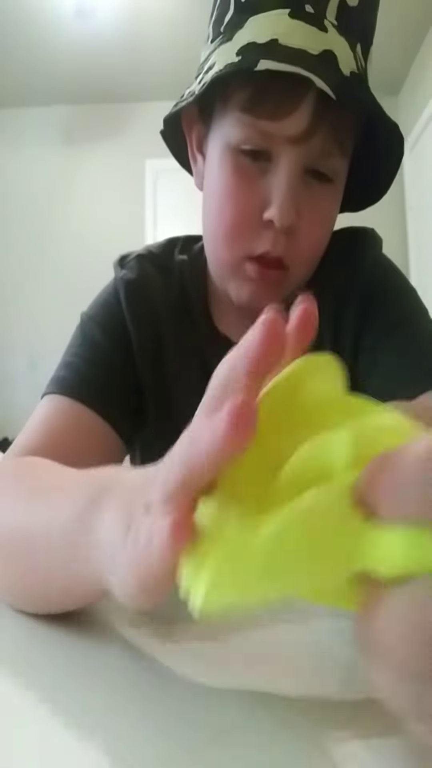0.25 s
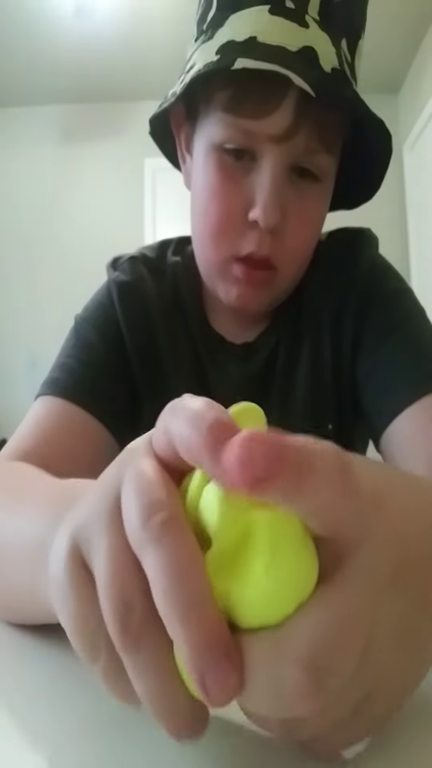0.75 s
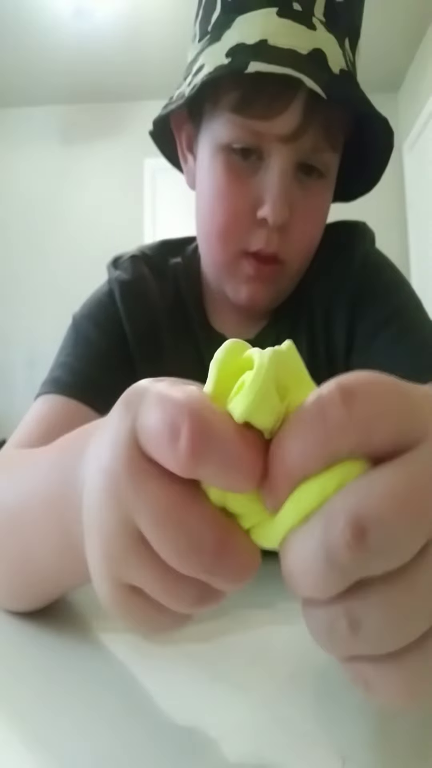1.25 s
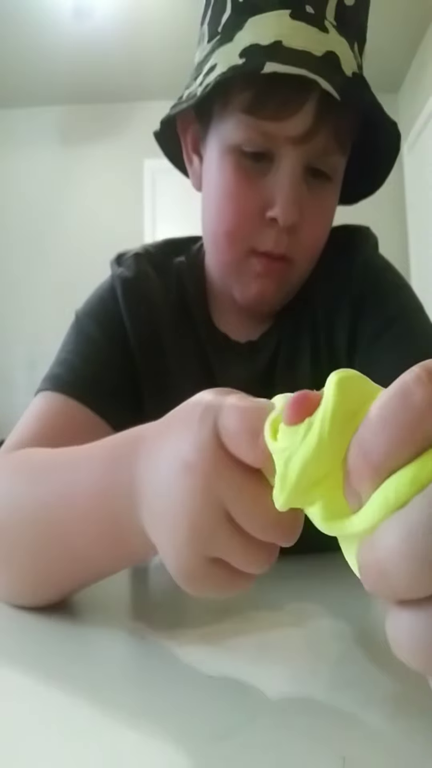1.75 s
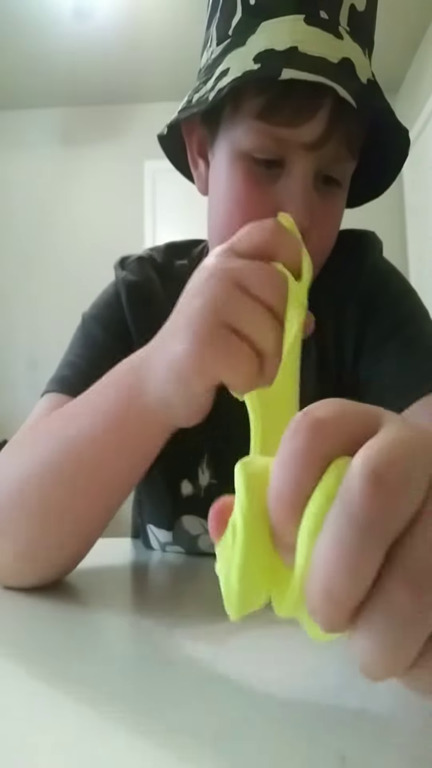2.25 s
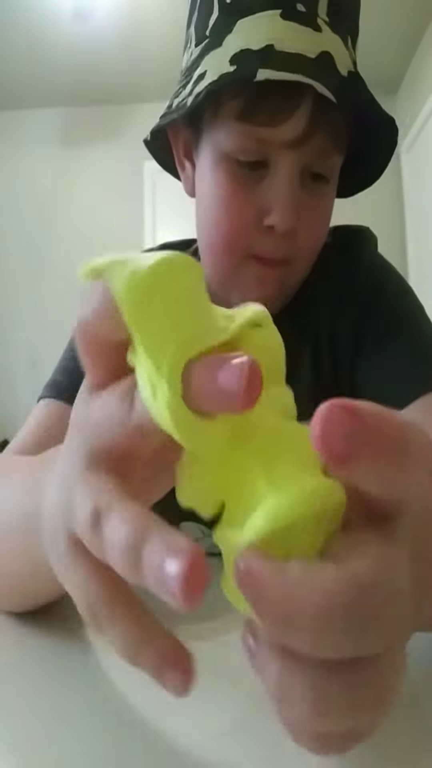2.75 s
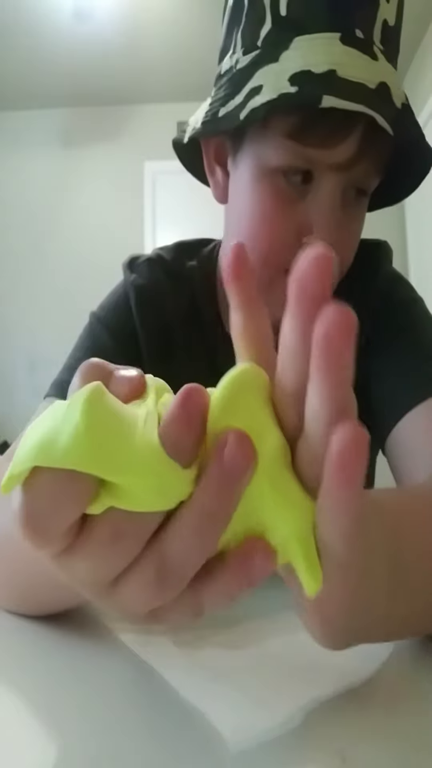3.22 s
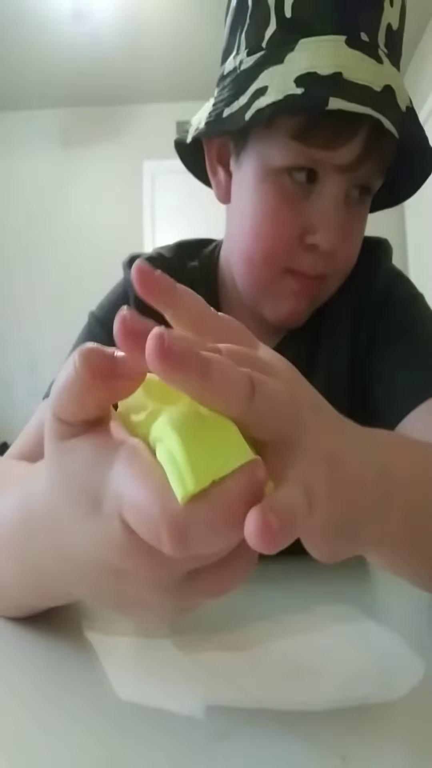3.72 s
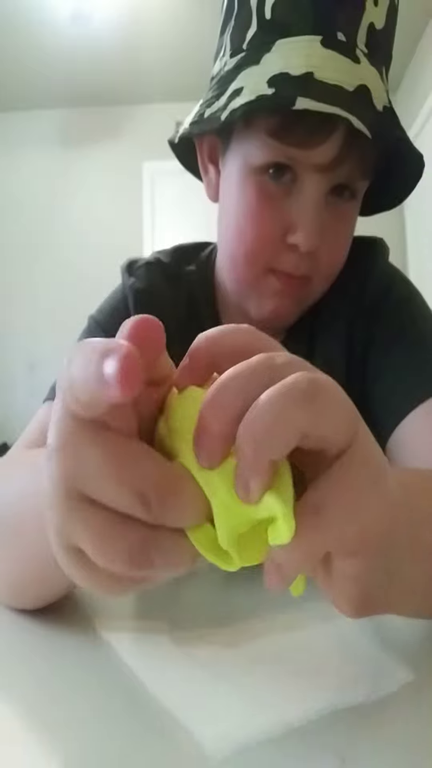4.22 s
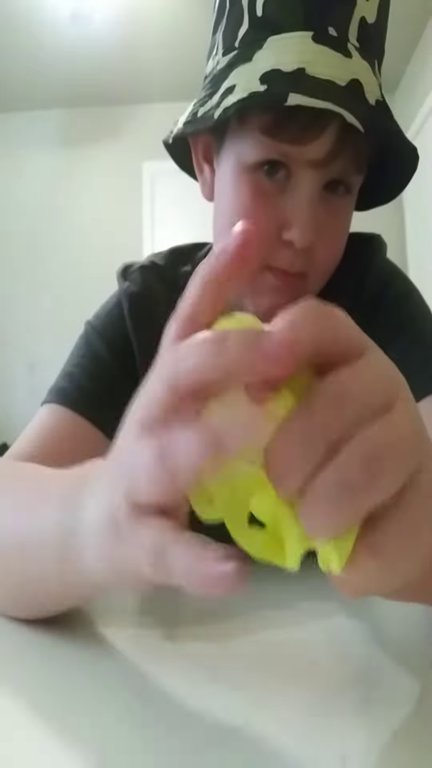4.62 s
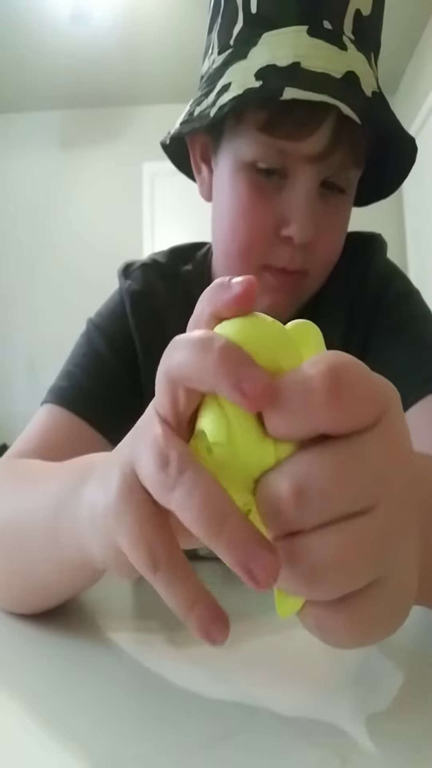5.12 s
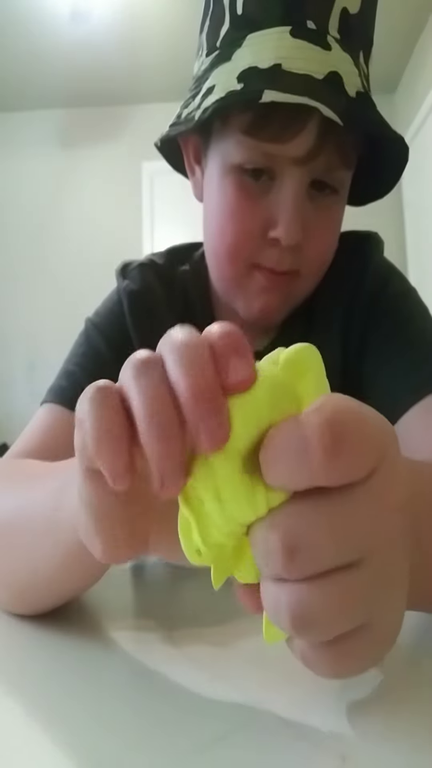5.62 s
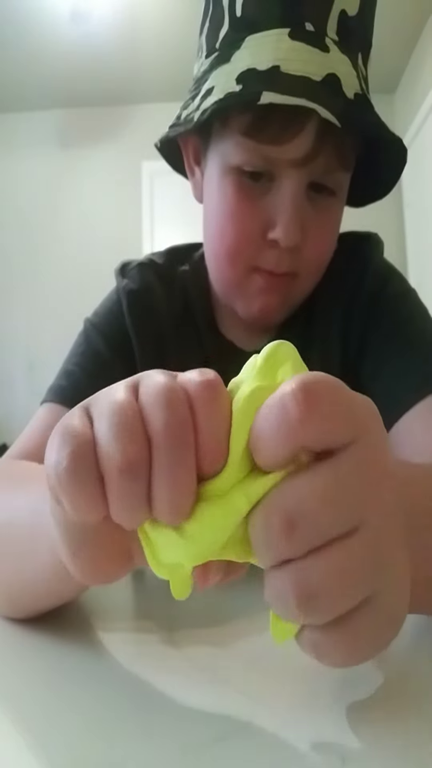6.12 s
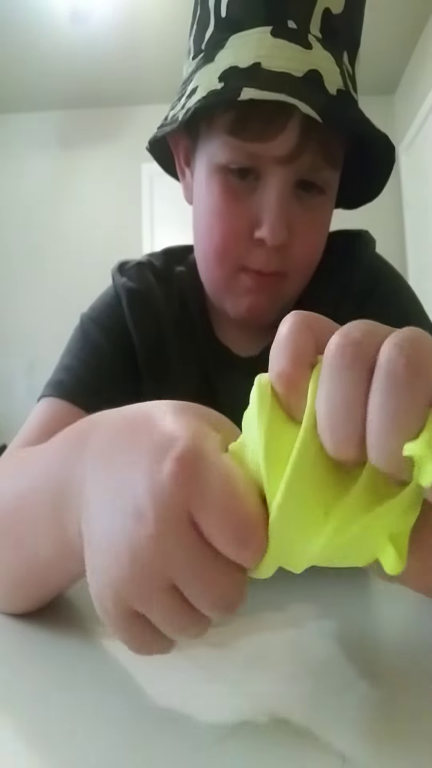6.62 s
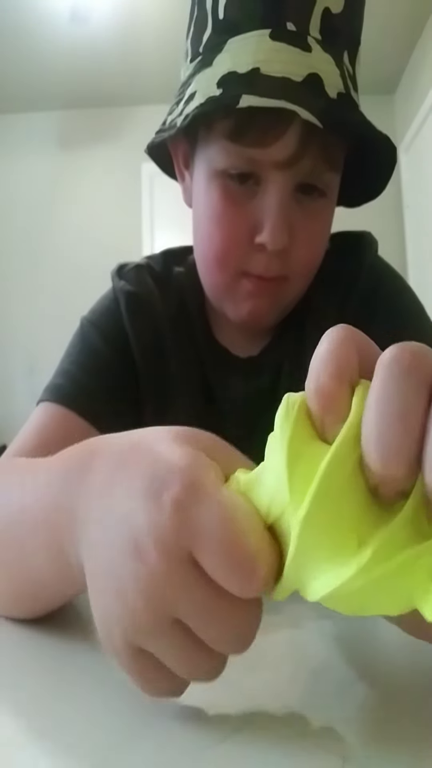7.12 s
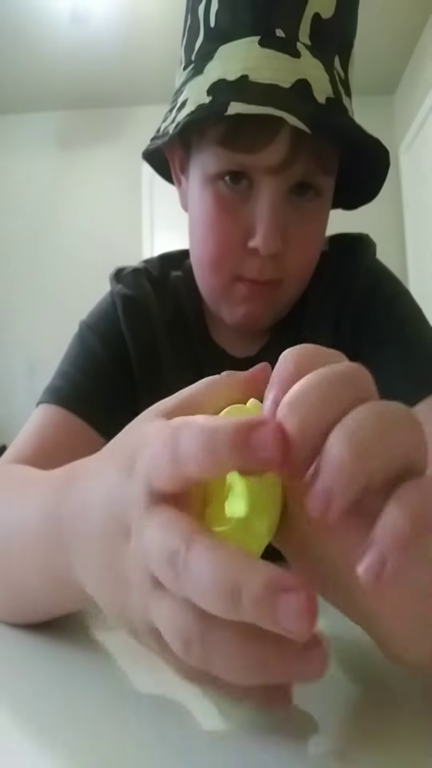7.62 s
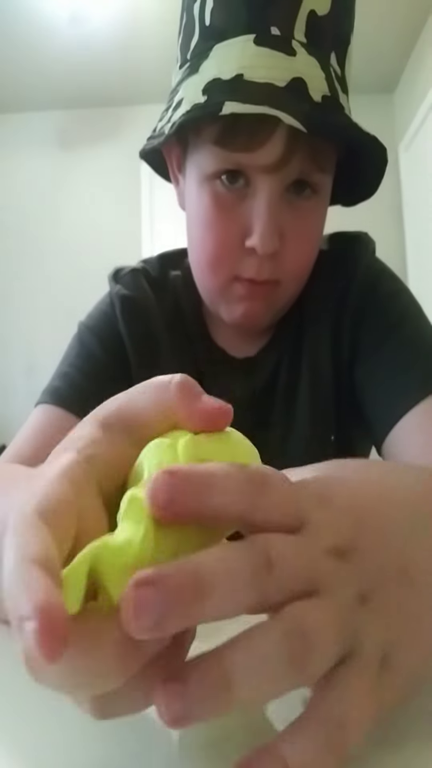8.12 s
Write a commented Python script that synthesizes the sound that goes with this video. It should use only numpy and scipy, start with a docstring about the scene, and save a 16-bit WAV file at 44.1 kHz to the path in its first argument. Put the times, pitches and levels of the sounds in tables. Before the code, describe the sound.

Hands knead a lump of soft slime above a table, close to a microphone standing on the top. A quiet wet squelch opens over a low rumble, which swells and fades with each squeeze. Forearms and knuckles thump the table irregularly, with tiny air pops between. Palms clap dully on the lump at about 0.9 and 1.3 seconds. Around 2.1 seconds comes a quick cluster of thumps and small squelches, then a stronger hollow clap at 3.2 seconds. A loud thump with a squelch lands at 4.6 seconds, followed by lighter knocks. The biggest squelch, with popping air and another loud thump, comes at 6.7 seconds. A few more knocks follow around 7.4 seconds and small pops near 7.9. The small bare room rings briefly after each sound, over a faint steady hiss.

```python
"""A wet squelch comes first, over a low rumble: hands squeeze air out of a lump of soft slime.
They knead it above a table in a small bare room, close to a microphone standing on the table top.
Forearms and knuckles thump the top and keep it trembling, palms clap the lump, and trapped air
pockets pop. The room rings after each sound, over a faint steady hiss."""
import sys
import numpy as np
from scipy import signal
from scipy.fft import rfft, irfft
from scipy.io import wavfile
from scipy.ndimage import uniform_filter1d

SR = 44100
rng = np.random.default_rng(int(sys.argv[2]) if len(sys.argv) > 2 else 0)


def log_audio(samples):
    """Write samples as a 16-bit WAV file to the path given in sys.argv[1]."""
    # one column per channel
    frames = np.atleast_2d(samples).T
    # limit to full scale, then quantise
    limited = np.clip(frames, -1, 1)
    pcm = np.round(limited * 32767).astype(np.int16)
    wavfile.write(sys.argv[1], SR, pcm)


N = 368233

# arms and knuckles on the table: (time [s], relative force [dB], contact time [ms])
THUMPS = [(0.2286, -27, 2.8), (0.802, -32, 8.4), (1.2423, -28, 3.5), (1.2978, -26, 4.9),
          (1.443, -30.5, 7.4), (1.7021, -34, 4.2), (2.064, -25, 6.8), (2.116, -21, 6.4),
          (2.162, -24.5, 8.7), (2.8704, -32, 1.8), (2.9286, -22.5, 2.36), (3.163, -29.5, 2.8),
          (3.605, -28, 7.8), (3.667, -24, 3.74), (4.45, -33.5, 6.9), (4.634, -13, 2.7), (4.698, -38.5, 1.7),
          (4.819, -21, 2.6), (5.0279, -23.5, 2.7), (5.5113, -33.5, 5.9), (5.751, -34, 8.1),
          (6.5307, -28.5, 4.64), (6.728, -14, 3.8), (6.7773, -19, 2.64), (7.092, -42.5, 2.5),
          (7.333, -26.5, 10.6), (7.4072, -25, 3.8), (7.4348, -28, 3.5), (7.5412, -23.5, 1.74),
          (7.893, -41.5, 1.6)]
# the top under the microphone: (pitch [Hz], width [Hz], gain [dB], way it moves the microphone [+1/-1])
TABLE_MODES = [(65.4, 24.3, -6.5, -1), (104.7, 33.5, 3, 1), (243.3, 68, 2.3, -1), (335, 65, -9, -1)]
# large folds of air squeezed out:
# (time [s], level [dB], lowest pitch [Hz], brightness [Hz], width [share of the lowest pitch])
SQUELCHES = [(0.002, -48.5, 368, 1500, 1.0), (2.03, -45, 429, 880, 0.36), (2.161, -46.5, 438, 890, 0.29),
             (4.633, -36, 358, 1360, 0.52), (6.7265, -31.5, 376, 2100, 0.6)]
# resonances of one fold: (pitch [multiple of the lowest], gain [dB])
FOLD_MODES = [(1, -2.5), (2.12, -0.5), (3.2, -9), (5.15, -11)]
# small air pockets bursting: (time [s], peak [dB], pitch [Hz], width [Hz], overtone gain [dB])
POPS = [(0.294, -67, 1890, 170, -25), (1.113, -72.5, 1520, 90, -25), (1.157, -56, 610, 110, -29),
        (1.816, -68.5, 960, 109, -23), (2.160, -48.5, 664, 200, -28), (2.160, -65.5, 1620, 200, -25),
        (3.365, -60.5, 1135, 140, -9), (5.025, -57, 860, 280, -20), (6.526, -52, 600, 171, -26),
        (6.706, -57, 1020, 250, -8), (6.7149, -45.5, 1116, 188, -11), (6.7311, -40, 1010, 380, -20),
        (7.894, -61, 1280, 125, -4), (7.901, -47.5, 1910, 705, -25), (7.927, -60, 1905, 150, -27)]
# palms closing on the lump: (time [s], puff peak [dB], brightness [Hz], peak of the hollow [dB])
CLAPS = [(0.9170, -43.5, 490, -34.5), (1.2970, -35, 537, -29), (2.87, -42.5, 370, -39.5),
         (3.1627, -24.5, 580, -29), (6.727, -37.5, 452, -29)]
# squeezes of the lump: (time of the hardest press [s], relative level [dB], build-up time [s])
SQUEEZES = [(0.0, -46.5, 0.3), (0.83, -55, 0.35), (1.42, -52, 0.37), (1.76, -55.5, 0.15), (2.22, -46, 0.28),
            (3.22, -42, 0.1), (3.7, -49.5, 0.19), (4.09, -52, 0.16), (4.77, -44.5, 0.25),
            (5.55, -49.5, 0.18), (6.09, -53.5, 0.19), (6.559, -49.5, 0.29), (6.92, -49.5, 0.31),
            (7.52, -47, 0.29)]
# the trembling table: (frequency [Hz], relative density [dB])
RUMBLE_SPECTRUM = [(20, -10), (38, -14.5), (55, -1), (85, 4.5), (120, -3), (165, -5), (240, -33),
                   (350, -31.5), (600, -49.5), (1500, -87)]
# the small bare room: (frequency [Hz], time to fall by 60 dB [s])
ROOM_DECAY = [(70, 0.58), (150, 0.3), (400, 0.28), (1000, 0.28), (3000, 0.19)]
# the background hiss: (frequency [Hz], relative density [dB])
HISS_SPECTRUM = [(20, 9), (200, 19.5), (400, 9.5), (800, 4.5), (1500, 2.5), (3000, -0.5), (6000, -2.5),
                 (15000, -3)]


def thumps(spread_db_per_ms=0):
    """Flesh cushions each blow; the table's modes swell and die as the bending wave crosses it."""
    t = np.arange(SR // 4) / SR
    ring, force = np.zeros(len(t)), np.zeros(N)
    for hz, width, db, way in TABLE_MODES:
        age = np.pi * width * t
        ring += np.sign(way) * gain_of(db) * age * np.exp(-age) * np.sin(2 * np.pi * hz * t)
    lead_s = 0.01  # centres each push on its time
    for s, db, contact_ms in THUMPS:
        push = np.exp(-8 * ((t - lead_s) * 1000 / contact_ms) ** 2)
        add(force, s - lead_s, gain_of(db + spread_db_per_ms * contact_ms) * push / push.sum())
    return signal.fftconvolve(force, ring)[:N]


def pops(spatter_db=-10, spatter_s=0.02, scatter_octaves=0.4, neighbours=6):
    """Each pocket bursts; the more it tears, the more loudly its small neighbours burst after it."""
    out = np.zeros(N)
    for s, db, hz, width in air_pockets():
        add(out, s, bubble(db, hz, width))
        tearing = width / hz
        for late, shift in rng.random((neighbours, 2)):
            neighbour_hz = hz * 2 ** (scatter_octaves * (2 * shift - 1))
            add(out, s + spatter_s * late, tearing * bubble(db + spatter_db, neighbour_hz, width))
    return out


def air_pockets(dull_db_per_octave=45, width_growth=0.66, overtone_ratio=1.5):
    """Air rings in folds, small pockets and smacks: (time [s], peak [dB], pitch [Hz], width [Hz])."""
    for s, db, hz, top_hz, share in SQUELCHES:
        for multiple, mode_db in FOLD_MODES:
            dull_db = dull_db_per_octave * max(np.log2(multiple * hz / top_hz), 0)
            yield s, db + mode_db - dull_db, multiple * hz, share * hz * multiple ** width_growth
    for s, db, hz, width, overtone_db in POPS:
        yield s, db, hz, width
        yield s, db + overtone_db, overtone_ratio * hz, width
    # the slime smacks with each knock, less the slower the knock
    smack_db, smack_db_per_ms, smack_hz, smack_width_hz = -20, -7.5, 775, 320
    for s, db, contact_ms in THUMPS:
        yield s, db + smack_db + smack_db_per_ms * contact_ms, smack_hz, smack_width_hz


def bubble(db, hz, width, rise=0.012):
    """An air pocket rings for a few cycles; its pitch climbs a little as the hole widens."""
    age = np.pi * width * np.arange(SR // 12) / SR / 2  # 1 at the loudest moment
    turns = np.cumsum(hz * (1 + rise * np.tanh(age - 1))) / SR
    return gain_of(db) * (age * np.exp(1 - age)) ** 2 * np.sin(2 * np.pi * turns)


def claps(lowest_hz=135, hollow_hz=185, hollow_width_hz=185):
    """A palm drives a dull puff of air out of the lump; the hollow between the hands answers briefly."""
    out, impulse = np.zeros(N), signal.unit_impulse(SR // 10)
    for s, db, top_hz, hollow_db in CLAPS:
        puff = signal.sosfilt(signal.butter(7, top_hz, fs=SR, output="sos"), impulse)
        puff = signal.sosfilt(signal.butter(1, top_hz / 2, fs=SR, output="sos"), puff)
        puff = signal.sosfilt(signal.butter(3, lowest_hz, "high", fs=SR, output="sos"), puff)
        add(out, s, -gain_of(db) * puff / abs(puff).max())
        add(out, s, -bubble(hollow_db, hollow_hz, hollow_width_hz))
    return out


def rumble(gain_db=2.5, rest_db=-66, build_db=20, release_db_per_s=79.5):
    """The arms keep the table trembling under the microphone; each squeeze builds, peaks and lets go."""
    t = np.arange(N) / SR
    presses_db = [db - np.maximum(build_db * (s - t) / build_s, release_db_per_s * (t - s))
                  for s, db, build_s in SQUEEZES]
    effort = np.sqrt(gain_of(rest_db) ** 2 + (gain_of(presses_db) ** 2).sum(0))
    return gain_of(gain_db) * effort * noise(RUMBLE_SPECTRUM)


def room(sound, delay_s, build_s, tails=4):
    """The hands move about, so the pattern of reflections at the microphone keeps changing."""
    turn = np.pi * np.arange(N) / SR
    out = np.zeros(N)
    for k in range(tails):
        share = np.cos(turn + np.pi * k / tails)
        out += signal.fftconvolve(sound * share, room_tail(delay_s, build_s))[:N]
    return out * np.sqrt(2 / tails)


def room_tail(delay_s, build_s):
    """Dense reflections build up, then die band by band, the bass last."""
    hz, t, bands = signal.stft(rng.standard_normal(SR), SR, nperseg=512)
    decay = gain_of(-60 * t / value_at(ROOM_DECAY, hz)[:, None])
    echoes = signal.istft(bands * decay, SR)[1][:SR]
    age = np.maximum(np.arange(SR) / SR - delay_s, 0)
    spectrum = rfft(echoes * (1 - np.exp(-age / build_s)))
    band_power = uniform_filter1d(abs(spectrum) ** 2, size=90)
    return irfft(spectrum / np.sqrt(band_power), SR)  # equal power in every band


def hiss(level_db=-73.5):
    """A faint steady hiss lies behind everything."""
    return gain_of(level_db) * noise(HISS_SPECTRUM)


def noise(spectrum):
    """Noise of rms 1 with the given spectral shape."""
    shape = gain_of(value_at(spectrum, np.fft.rfftfreq(N, 1 / SR)))
    x = irfft(rfft(rng.standard_normal(N)) * shape, N)
    return x / x.std()


def gain_of(db):
    """Decibels to gain."""
    return 10 ** (np.asarray(db) / 20)


def value_at(points, hz):
    """A curve's value at hz, its points joined on a log frequency axis."""
    f, value = np.transpose(points)
    return np.interp(np.log(hz + 1), np.log(f + 1), value)


def add(mix, s, sound):
    """Lays a sound into the mix at time s."""
    part = mix[max(round(s * SR), 0):][:len(sound)]
    part += sound[:len(part)]


def scene(thump_room_db=-15.0, clap_room_db=-8, pop_room_db=-7.0):
    """Table, hands and slime close to the microphone, the room and the hiss behind them; mono."""
    palms, slime = claps(), pops()
    near = thumps() + palms + slime + rumble()
    # a slow push rocks the whole top, so it spreads more sound into the room than a quick knock
    table_send = gain_of(thump_room_db) * thumps(spread_db_per_ms=1.48)
    hands_send = gain_of(clap_room_db) * palms + gain_of(pop_room_db) * slime
    boom = room(table_send, delay_s=0.0082, build_s=0.013)
    echo = room(hands_send, delay_s=0.0036, build_s=0.0025)
    return (near + boom + echo + hiss())[None]


def record(dry, edge_hz=15520):
    """The recorder's band limit cuts the highest treble."""
    lowpass = signal.firwin(1023, edge_hz, window=("kaiser", 9), fs=SR)
    return signal.oaconvolve(dry, lowpass[None], "same")


dry = scene()
out = record(dry)
log_audio(out)
```